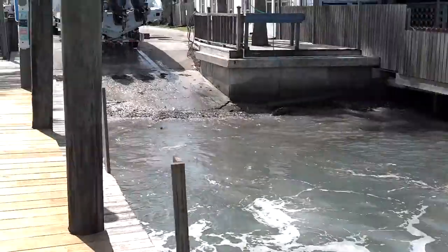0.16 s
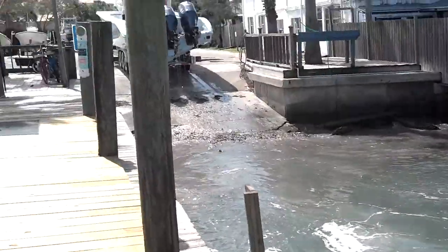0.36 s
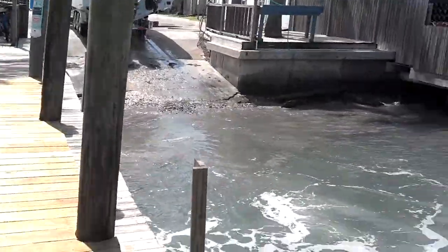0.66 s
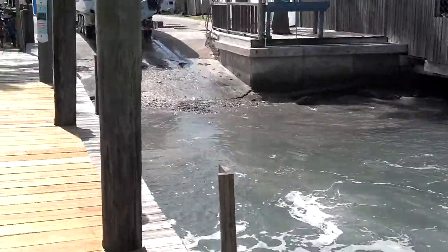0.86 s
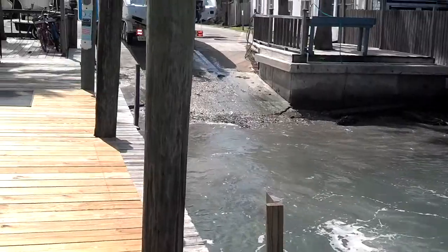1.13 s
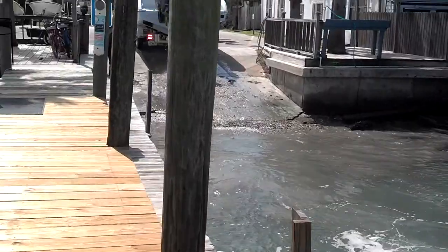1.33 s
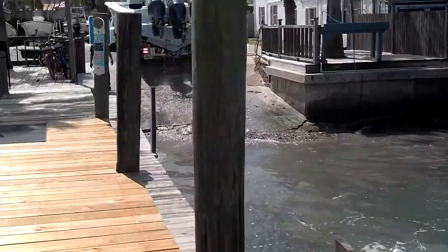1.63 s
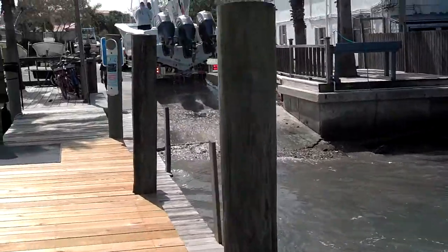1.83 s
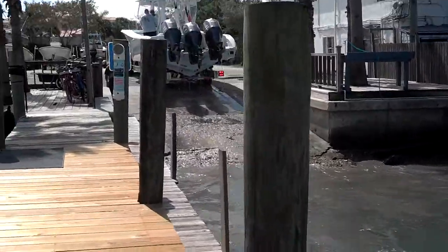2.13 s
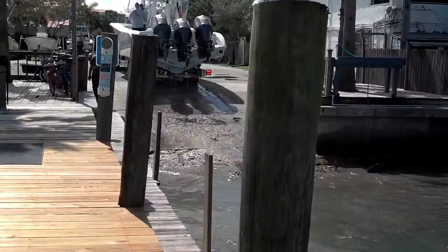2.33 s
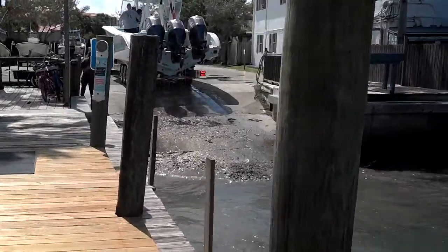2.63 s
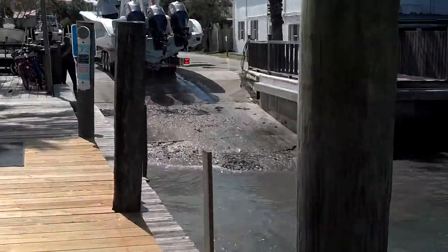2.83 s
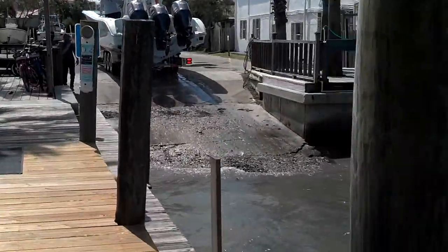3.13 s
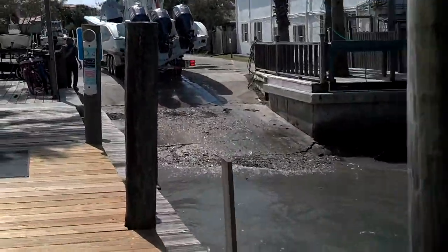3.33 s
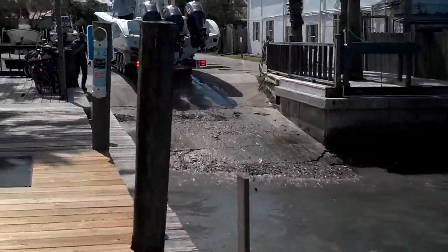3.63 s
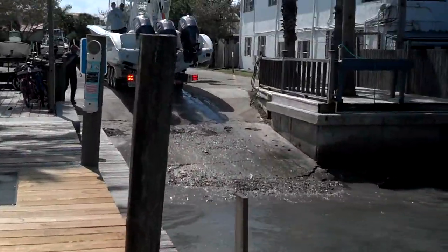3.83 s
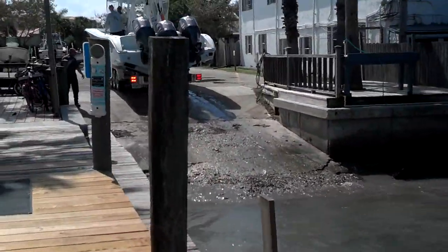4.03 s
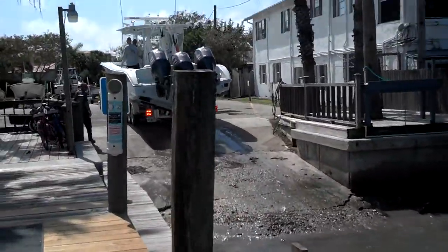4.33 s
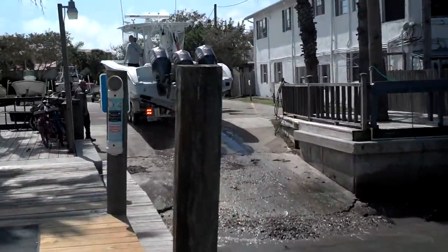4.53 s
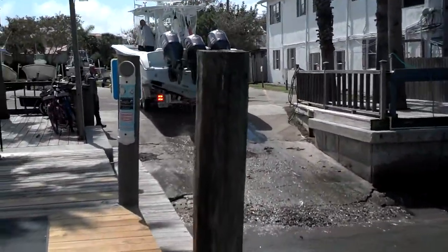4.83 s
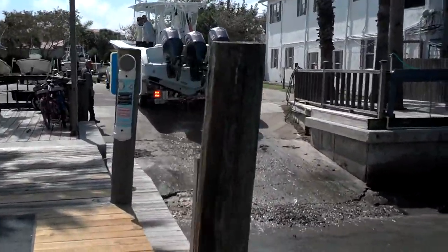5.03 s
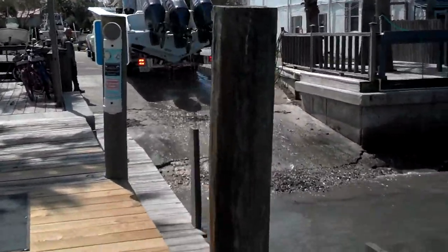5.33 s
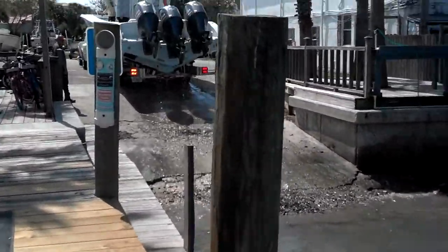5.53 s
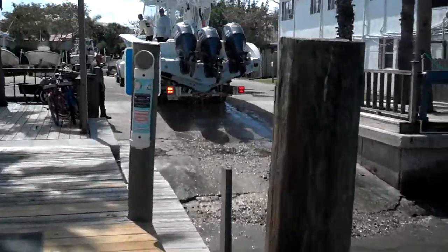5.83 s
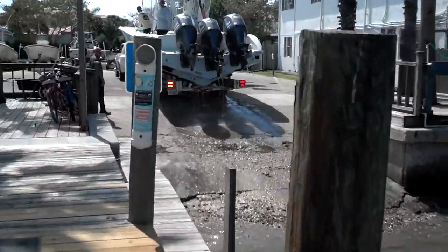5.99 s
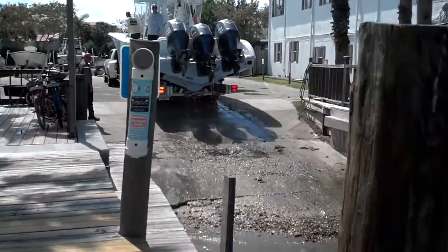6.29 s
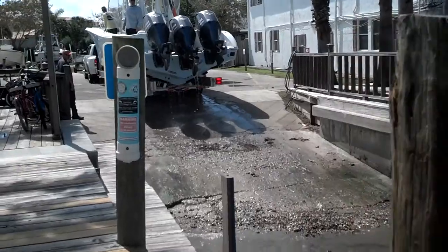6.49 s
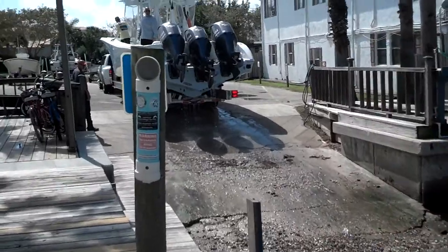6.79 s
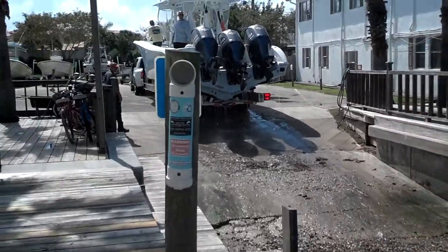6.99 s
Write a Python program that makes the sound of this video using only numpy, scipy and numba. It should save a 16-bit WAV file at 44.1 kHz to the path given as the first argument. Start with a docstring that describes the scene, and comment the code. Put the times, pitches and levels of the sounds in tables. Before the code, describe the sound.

Heard from a dock with a handheld stereo camera: a trailer jolts and knocks with short, hollow metallic rings, over busy lapping water. The clatter stops and the wash calms somewhat, leaving gurgles, small splashes and ticking drops. A very thin high squeal passes briefly. A far motor drones softly; body clicks briefly dip the level, and a wind thump comes near the end.

```python
"""The foot of a concrete boat ramp, heard from a wooden dock on a hand-held camera with two capsules.
Water washes over the ramp: banded noise hisses and surges with each small wave, fading rings bubble
and splash. Jolts ring the frame of a trailer, a brake squeals briefly and a motor hums far off.
Band-limited puffs of wind hit the microphone; sharp ticks of the camera body make its gain control duck."""
import sys
import numpy as np
from scipy import signal
from scipy.fft import rfft, irfft, next_fast_len
from scipy.io import wavfile
from scipy.ndimage import uniform_filter1d
from numba import njit

SR = 44100
rng = np.random.default_rng(int(sys.argv[2]) if len(sys.argv) > 2 else 0)


def natural_amplitude(level_db):
    """Convert a level in decibels to a linear amplitude factor, elementwise."""
    exponent = np.asarray(level_db, float) / 20
    return 10 ** exponent


def dump(signal):
    """Clip the signal to [-1, 1] and save it as 16-bit WAV at the path in sys.argv[1]."""
    limited = np.clip(np.atleast_2d(signal).T, -1, 1)
    pcm = np.round(limited * 32767).astype(np.int16)
    wavfile.write(sys.argv[1], SR, pcm)


N = 315342
T = np.arange(N) / SR


def unit(x):
    """Scale to rms 1."""
    return x / np.sqrt(np.mean(x ** 2))


def band(x, lo_hz, hi_hz):
    """Band-pass between two corner frequencies."""
    return signal.sosfilt(signal.butter(2, [lo_hz, hi_hz], "band", fs=SR, output="sos"), x)


def walk(rate):
    """Wandering level: a new random value every 1 / rate seconds, with slewed steps."""
    hold = int(SR / rate)
    steps = np.repeat(rng.standard_normal(N // hold + 1), hold)
    return 0.85 * uniform_filter1d(steps, hold)[:N]


@njit
def rings(start, hz, cycles, size, glide, count):
    """Sines fading to 1/e in the given cycles, while the pitch climbs by the share glide."""
    out = np.zeros(count)
    for k in range(len(start)):
        decay = cycles[k] * SR / hz[k]
        phase = 0.
        for i in range(min(int(5 * decay), count - start[k])):
            phase += 2 * np.pi * hz[k] * (1 + glide * i / decay) / SR
            out[start[k] + i] += size[k] * np.exp(-i / decay) * np.sin(phase)
    return out


def ring(s, hz, cycles, size, glide):
    """Fading rings that start at times in seconds."""
    s = np.clip(s, 0, T[-1])
    start = (s * SR).astype(np.int64)
    return rings(start, 1. * hz, cycles + 0 * s, size + 0 * s, 1. * glide, count=N)


def particles(per_s, scatter_db):
    """Random impulses of either sign; a few are far bigger than the rest."""
    hit = rng.random(N) < per_s / SR
    return unit(hit * rng.standard_normal(N) * natural_amplitude(scatter_db * rng.exponential(size=N)))


def pair(x, lag_s, right_db):
    """One compact source at both capsules: the right hears it lag_s later and right_db louder."""
    return np.array([x, natural_amplitude(right_db) * np.interp(T - lag_s, T, x)])


def swells(s, fall_s, rise_share):
    """One power envelope an event; the rise takes rise_share of the fall time."""
    late = (T[::64] - s[:, None]) / fall_s[:, None]
    return np.exp(-np.where(late < 0, late / rise_share, late) ** 2)


def power_db(power):
    """Coarse power envelope to dB, one value a sample."""
    return np.interp(T, T[::64], 10 * np.log10(power + 1e-9))


# small waves reaching the ramp: (crest time [s], power added relative to calm water [dB],
#                                 fall time to 1/e power [s], typical bubble radius [mm])
RAMP_WAVES = [(0.08, 7.5, 0.16, 3.7), (0.43, 8.5, 0.12, 3.4), (0.7, 9, 0.16, 3.2), (1.09, 6, .08, 2.8),
              (1.31, 6, 0.14, 3.8), (1.55, 10, 0.078, 2.6), (1.76, 2, 0.18, 3.8), (2.11, 4.5, 0.13, 3.2),
              (2.42, -1.5, 0.14, 0.5), (2.63, 4, 0.11, 2.3), (3.0, 9.5, .14, 3.8), (3.4, 0, 0.089, 0.99),
              (3.58, 1.5, 0.22, 1.8), (4.07, -0.5, .1, 1.1), (4.3, -3, 0.15, 2.5), (4.61, 3, .07, 3.2),
              (4.78, 9, 0.11, 3.5), (4.97, 4, 0.12, 2.1), (5.17, 5.5, 0.17, 3.6), (5.491, 2.5, 0.1, 2.2),
              (5.72, 3, 0.12, 2.4), (6.02, -1, 0.088, 1), (6.28, -1, 0.03, 1.5), (6.5, -1, 0.096, 4),
              (6.75, 4.5, 0.14, 2.6), (6.93, 0.5, 0.083, 5.1), (7.041, 0, .08, 1)]
BUBBLE_HZ_MM = 3260  # pitch times radius of a bubble
SPREAD_OCTAVES = 1.39  # bubble sizes scatter around the typical one


def waves_db(hz):
    """Lift over calm water near hz: each wave feeds most the pitch of its own bubbles."""
    s, db, fall_s, mm = np.transpose(RAMP_WAVES)
    octaves_off = np.log2(hz * np.maximum(mm, .1) / BUBBLE_HZ_MM)
    near = np.exp(-(octaves_off / SPREAD_OCTAVES) ** 2 / 2)
    return power_db(1 + natural_amplitude(2 * db) * near @ swells(s, fall_s, rise_share=0.73))


RUMBLE_DB = -37
CALM_GURGLE_DB, CALM_SLOSH_DB, CALM_HISS_DB = -37.5, -36.5, -37.5


def flow_db(octave):
    """Level of water in the band at 2 ** octave Hz; the far rumble at the bottom ignores the waves."""
    if octave < 7.9:
        return RUMBLE_DB
    calm_db = CALM_GURGLE_DB if octave < 10.4 else CALM_SLOSH_DB if octave < 11.6 else CALM_HISS_DB
    return waves_db(2 ** octave) + calm_db


# colour of the wash at the microphone: (frequency [Hz], relative level per hertz [dB],
#                                       likeness of the two capsules [0-1], left minus right [dB])
WASH_COLOUR = [(60.6, 6, 0.94, -2), (121, 23.5, 1, -0.5), (190, 18, 0.99, -1), (370, 11, 0.87, -0.5),
               (830, 4, 0.47, -3), (1300, 1, 0.08, 3.5), (2236, 6.5, 0.01, -2), (3000, 0, 0, -10),
               (4200, 1, 0.01, 4.5), (5660, 2, 0.03, 8.5), (8600, 0, 0.13, 1.5), (10620, -7, 0.03, -7),
               (11900, -7, 0, -7.5), (13600, -1, 0.07, 8), (15600, -5.5, 1, 13.5)]


def wash():
    """Bursting foam and rushing water; half-octave bands swell together and flicker alone."""
    hz_points, *columns = np.transpose(WASH_COLOUR)
    size = next_fast_len(N)
    hz = np.maximum(np.fft.rfftfreq(size, 1 / SR), 1)
    db, alike, pan_db = (np.interp(np.log(hz), np.log(hz_points), c) for c in columns)
    alike = np.clip(alike, 0, 1)

    grainy = np.clip(hz / 6200.0, 0, .8)  # high bands come from separate small bubbles
    burst = rfft(np.array([particles(6000, 2.48) for _ in range(3)]), size)
    rush = rfft(rng.standard_normal((3, size)))
    common, *own = np.sqrt(grainy) * burst + np.sqrt(1 - grainy) * rush
    both = np.sqrt(alike) * common + np.sqrt(1 - alike) * np.array(own)
    both = both * natural_amplitude(db + np.array([pan_db, -pan_db]) / 2)
    both = both * np.minimum(hz / hz_points[0], 1) ** 3  # no deepest bass

    surge, out = walk(22), 0
    for octave in np.arange(5.5, 14.6, 1 / 2):
        # neighbouring bands add up to one
        share = np.cos(np.pi * np.clip(np.log2(hz) - octave, -1 / 2, 1 / 2)) ** 2
        level_db = flow_db(octave) + 0.68 * surge + 1.8 * walk(18)
        out = out + irfft(both * share, size)[:, :N] * natural_amplitude(level_db)
    return out


# splashes and low gulps: (start [s], level before bubble scatter [dB], bubble pitch [Hz], length [s])
SPLASH_CLUSTERS = [(0.037, -33, 1040, 0.032), (1.529, -16.5, 1800, 0.053), (1.56, -22.5, 468, 0.067),
                   (1.744, -29.5, 1146, 0.019), (2.028, -27.5, 170, 0.026), (2.109, -29, 1100, 0.031),
                   (2.138, -26, 144, 0.034), (2.307, -27.5, 1350, 0.0075), (2.388, -23.5, 1300, 0.009),
                   (2.68, -22, 1550, .02), (2.982, -23, 1550, .03), (3.028, -24, 1090, 0.044),
                   (3.169, -27, 532, 0.041), (3.542, -29, 1490, 0.022), (3.603, -26, 1510, 0.038),
                   (3.7, -28, 1630, .02), (4.125, -26.5, 1960, 0.017), (3.365, -29.5, 600, .025),
                   (4.34, -32, 790, .02), (4.53, -27.5, 804, .03), (4.599, -25, 232, .03),
                   (4.74, -20.5, 1576, 0.023), (4.802, -25.5, 540, .02), (5.468, -26, 1426, .015),
                   (5.645, -26, 1813, 0.021), (5.732, -32, 930, .015), (5.875, -31, 1860, .01),
                   (6.276, -30, 1400, 0.018), (6.475, -26, 2100, 0.011), (6.76, -23, 1520, .015),
                   (6.909, -30, 795, .03), (7.003, -21, 2140, .01)]


def splashes():
    """Each splash is a quick cluster of 18 bubbles around its pitch, densest at the start."""
    s, db, hz, length = np.transpose(SPLASH_CLUSTERS)[:, :, None]
    delay, detune, strength = rng.random((len(s), 3, 18)).transpose(1, 0, 2)
    start = s + length * delay ** 1.5
    pitch = hz * 2 ** (0.14 * (detune - 1 / 2))
    size = natural_amplitude(db) * (strength - .3)
    return pair(ring(start.ravel(), pitch.ravel(), 2.7, size.ravel(), 0.03), 7e-5, 0.65)


# single drops striking: (time [s], level at the left capsule before fading [dB], pitch [Hz])
SINGLE_DROPS = [(1.0849, -10, 3600), (1.932, -16.5, 4200), (2.38, -11, 3700), (3.501, -20, 4700),
                (4.1162, -8.5, 2900), (4.1577, -13.5, 3200), (4.325, -17, 3000), (4.357, -17, 3100),
                (4.9623, -14, 7100), (5.3441, -19, 2900), (5.6192, -16, 3300), (5.7878, -23, 6920),
                (5.9606, -17, 7200), (5.9936, -12.5, 5000), (6.0311, -17, 14000), (6.379, -21, 7000),
                (6.4504, -19, 2900), (6.473, -15, 3200), (6.703, -27, 2100), (7.004, -22, 2700),
                (7.0484, -14, 7050)]


def drops():
    """A drop striking ticks: a ring at fixed pitch that dies in about a cycle."""
    s, db, hz = np.transpose(SINGLE_DROPS)
    return pair(ring(s, hz, 1.3, natural_amplitude(db), 0), 0.00017, -6)


def bubbles():
    """Loose bubbles pop all the time, their pitch climbing, more strongly when the water sloshes."""
    when, pitch, strength, scatter = rng.random((2500, 4)).T
    size = natural_amplitude(14 * scatter) * (strength - 1 / 2)
    x = ring(when * T[-1], 500 * 2 ** (2.71 * pitch), 3.94, size, 0.135)
    return pair(unit(x) * natural_amplitude(waves_db(2000) - 55.5), 1e-4, 0.27)


# the trailer rolls over bumps: (hardest time [s], drive of the low modes [dB],
#                               fall time to 1/e power [s], high modes relative to the low [dB])
TRAILER_BUMPS = [(0.04, -33, 0.061, 3), (0.335, -33, 0.069, 6), (0.43, -28.5, 0.077, 3.5),
                 (0.56, -34.5, 0.097, 8.5), (0.65, -31, 0.045, 7), (0.69, -26.5, .05, 0),
                 (0.76, -24.5, 0.081, -1), (0.857, -30, 0.033, 7), (0.915, -28.5, 0.031, 6),
                 (0.962, -28.5, 0.052, 3.5), (1.085, -29.5, 0.087, 2), (1.2, -35, 0.034, -7),
                 (1.295, -36.5, .05, 6), (1.43, -37, 0.026, -2)]
# harder knocks: (time [s], impulse level before the band-pass [dB])
TRAILER_KNOCKS = [(0.331, -18), (0.361, -13), (0.556, -20), (0.713, -4), (0.855, -4), (0.914, -11),
                  (0.964, -1), (1.085, -3), (1.293, -9)]


def jolts():
    """Dense small impulses swell over each bump, with a few knocks; also gives the lift of high modes."""
    s, db, fall_s, bright_db = np.transpose(TRAILER_BUMPS)
    swell = swells(s, fall_s, rise_share=0.29)
    shake_db = power_db(natural_amplitude(2 * db) @ swell)
    high_db = power_db(natural_amplitude(2 * (db + bright_db)) @ swell) - shake_db
    shaking = particles(5000, 0.81) * natural_amplitude(shake_db + 1.55 * walk(40.4))
    s, db = np.transpose(TRAILER_KNOCKS)
    shaking[(s * SR).astype(int)] += natural_amplitude(db)
    return band(shaking, 533, 4700), high_db  # the light frame radiates no bass


# modes of the trailer frame: (frequency [Hz], level before bump brightness and flicker [dB],
#                              time to fade by 60 dB [s])
FRAME_MODES = [(565, -5.5, 0.16), (589, -8.5, 0.27), (653, -0.5, 0.059), (874, -8.5, 0.0082),
               (1100, -6.5, 0.031), (1267, -15, 0.033), (1470, -19, 0.014), (1773, -19, 0.043),
               (2340, -29, 0.047)]


def trailer():
    """Jolts ring the resonances of the frame, each a two-pole filter with a flickering level."""
    push, high_db = jolts()
    frame = 0
    for hz, mode_db, t60 in FRAME_MODES:
        r = np.exp(-np.log(1000) / (t60 * SR))
        turn = 2 * np.pi * hz / SR
        mode = signal.lfilter([np.sqrt(1 - r) * np.sin(turn)], [1, -2 * r * np.cos(turn), r * r], push)
        frame = frame + natural_amplitude(mode_db + high_db * (hz > 800) + 0.53 * walk(13.2)) * mode
    return pair(frame, 5e-5, 5.25)


# brake squeals: (from [s], to [s], frequency [Hz], left level before flicker [dB])
BRAKE_SQUEALS = [(2.31, 2.47, 9192, -40), (2.42, 2.52, 12800, -42), (2.427, 2.467, 6100, -42)]


def brake():
    """A brake squeals thinly: short steady tones whose level flickers."""
    squeal = 0
    for t0, t1, hz, db in BRAKE_SQUEALS:
        swell = np.clip(np.minimum(T - t0, t1 - T) / 0.016, 0, 1)
        squeal = squeal + swell * natural_amplitude(db + 2.5 * walk(39.0)) * np.sin(2 * np.pi * hz * T)
    return pair(squeal, 1e-4, -12)


# ticks of the camera body: (time [s], heard level before fading [dB], heard pitch [Hz],
#                           shrill ring above the hearing range, level before fading [dB])
BODY_TICKS = [(1.15, -12, 4200, -4.5), (2.463, -10, 8000, -0.5), (3.107, -20, 13000, -12),
              (3.7352, -7, 14000, -2.5), (4.3652, -7, 13300, -1), (5.915, -9, 6900, -4.5)]


def ticks():
    """Plastic ticks right at the capsules; a thin part rings on, a shrill ring stays on the left."""
    s, db, hz, shrill_db = np.transpose(BODY_TICKS)
    shrill = ring(s, 19500 + 0 * s, 10, natural_amplitude(shrill_db), 0)
    heard = ring(s, hz, 1.8, natural_amplitude(db), 0)
    tail = ring(s, 15700 + 0 * s, 61, natural_amplitude(db - 18), 0)
    return pair(heard + tail, 5e-5, -10.0) + shrill * np.array([[1], [0]])


# puffs of wind: (middle time [s], level before the capsule offsets [dB], half-length to 1/e [s])
WIND_PUFFS = [(0.374, -34, .03), (0.52, -43, 0.044), (2.83, -45, .08), (4.04, -41, 0.017),
              (4.336, -42, 0.032), (4.6, -47, .04), (4.99, -38, 0.027), (5.692, -39, 0.023),
              (5.78, -34, 0.024), (5.837, -40, .03), (6.2, -26.5, 0.051), (6.24, -19.5, 0.017),
              (6.323, -35, 0.037)]


def wind():
    """Low turbulent puffs at the microphone, different at each capsule; strong puffs reach higher."""
    power = natural_amplitude(2 * -56)  # faint wind between the puffs
    for s, db, length in WIND_PUFFS:
        power = power + natural_amplitude(2 * db) * np.exp(-((T - s) / length) ** 2 * 2)
    puff = np.sqrt(power)
    low = np.array([unit(band(rng.standard_normal(N), 70, 162)) for _ in range(2)])
    high = np.array([unit(band(rng.standard_normal(N), 170, 270)) for _ in range(2)])
    return puff * (low + 4.1 * puff * high) * natural_amplitude([[-4], [.8]])


# far motor, before its waver: (time [s], frequency [Hz], level at the left capsule [dB])
MOTOR_HUM = [(0, 356, -32.5), (.3, 355, -45.5), (.6, 347.7, -44.5), (1.4, 347.4, -60), (1.7, 353, -41),
             (2.4, 343.3, -46.5), (3.6, 347, -49), (4.3, 344, -42.5), (4.8, 345, -37.5), (5.8, 346, -39),
             (6.12, 339.4, -51), (6.6, 344.3, -50), (7.15, 340, -41)]


def hum():
    """One far motor tone, sagging unevenly, wavers a little in pitch and level."""
    s, *columns = np.transpose(MOTOR_HUM)
    hz, db = (np.interp(T, s, c) for c in columns)
    hz = hz + walk(12)
    db = db + 1.5 * walk(8)
    tone = np.sin(2 * np.pi * np.cumsum(hz) / SR) * natural_amplitude(db)
    return pair(tone, -0.00021, 0.35)  # reaches the right capsule first


def scene():
    """Sound at the two capsules."""
    water = wash() + splashes() + drops() + bubbles()
    return water + trailer() + brake() + ticks() + wind() + hum()


@njit
def follower(x, floor, fall):
    """Peak level: jumps up at once, sinks slowly, never under the floor."""
    out, e = np.empty(len(x)), floor
    for i in range(len(x)):
        e = max(x[i], e * fall, floor)
        out[i] = e
    return out


def top_cut(x):
    """Nothing passes above the cut-off."""
    return signal.sosfilt(signal.butter(12, 16860, fs=SR, output="sos"), x)


THRESHOLD_DB, RECOVER_DB_S = -10, 7  # gain control: shrill peak that starts a duck, speed of recovery
CROSS_LAG = 16  # samples


def record(dry):
    """Gain ducks on shrill peaks; each channel is its capsule minus the other delayed: a comb."""
    high_pass = signal.butter(4, 17500, "high", fs=SR, output="sos")
    shrill = np.abs(signal.sosfilt(high_pass, dry)).max(axis=0)
    threshold = float(natural_amplitude(THRESHOLD_DB))
    gain = threshold / follower(shrill, threshold, float(natural_amplitude(-RECOVER_DB_S / SR)))
    low_pass = signal.ellip(12, .2, 70, 15480, fs=SR, output="sos")
    held = signal.sosfilt(low_pass, dry * gain)
    wide = held - np.roll(held[::-1], CROSS_LAG, axis=1)
    return top_cut(wide)


dry = scene()
out = record(dry)
dump(out)
```